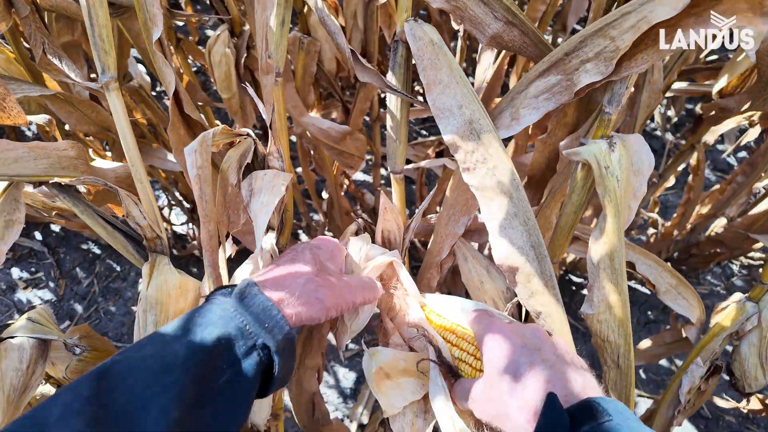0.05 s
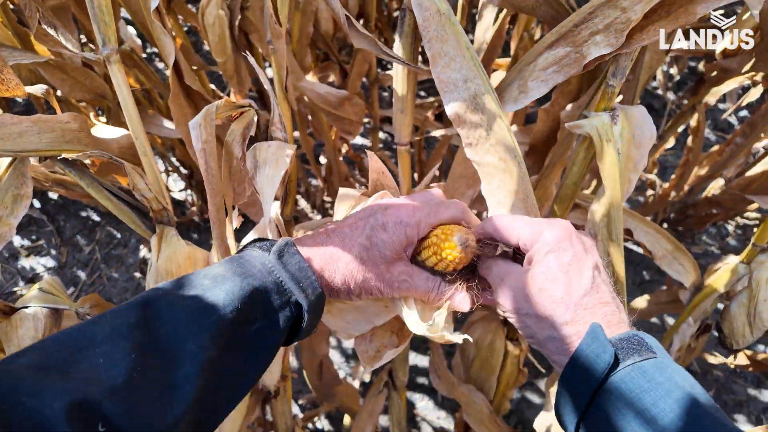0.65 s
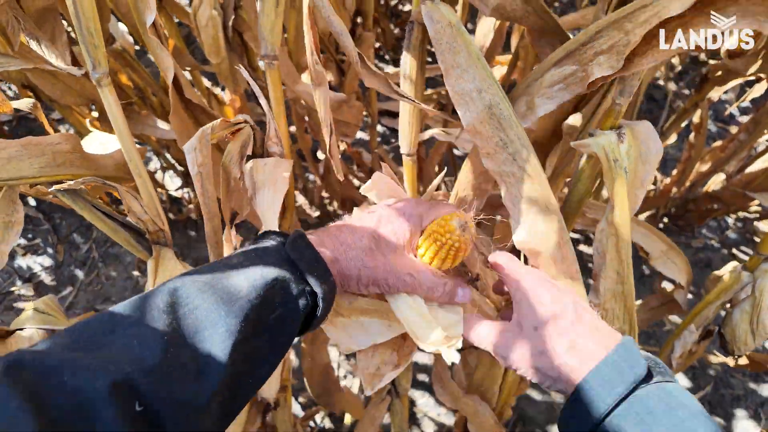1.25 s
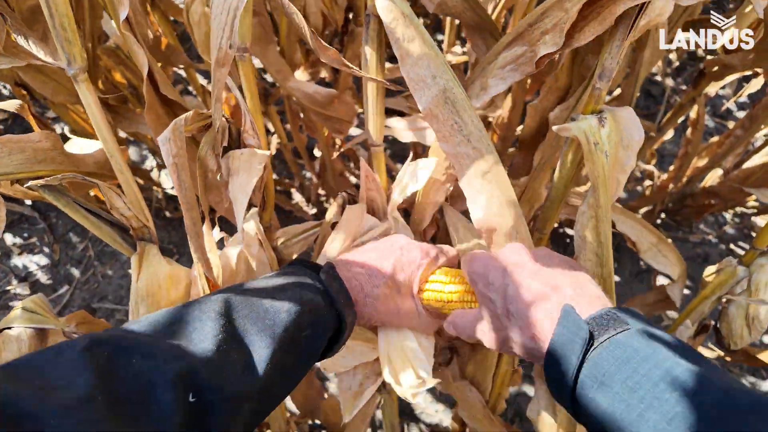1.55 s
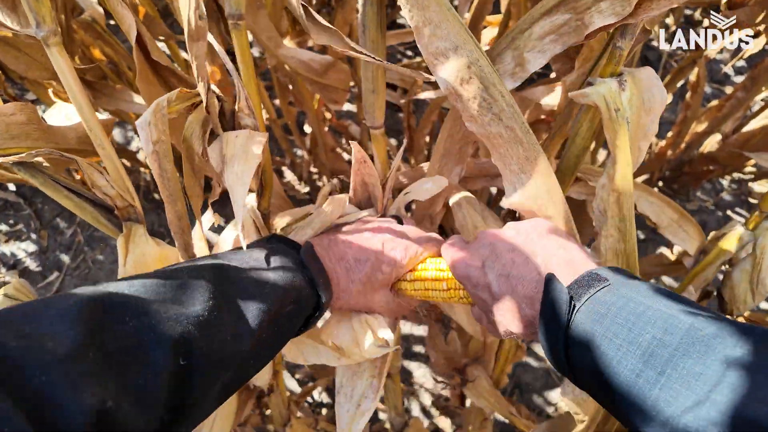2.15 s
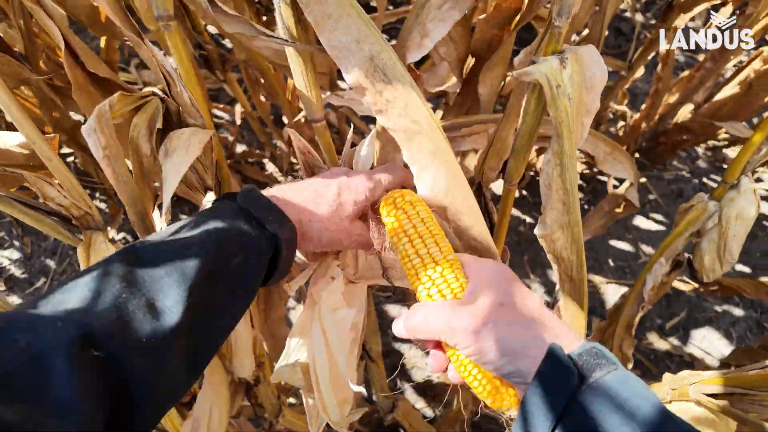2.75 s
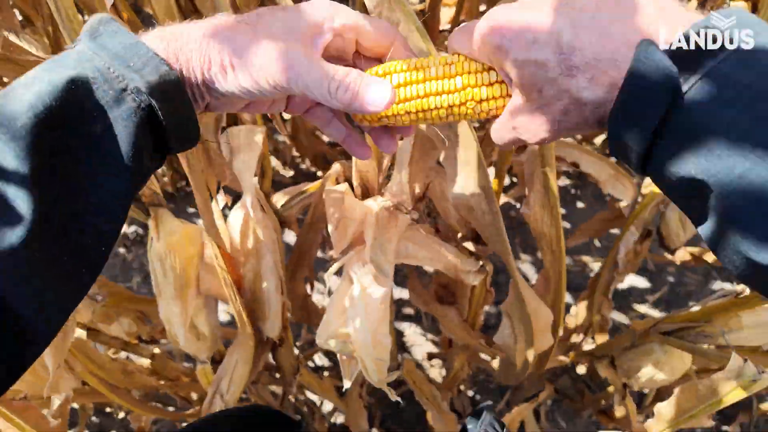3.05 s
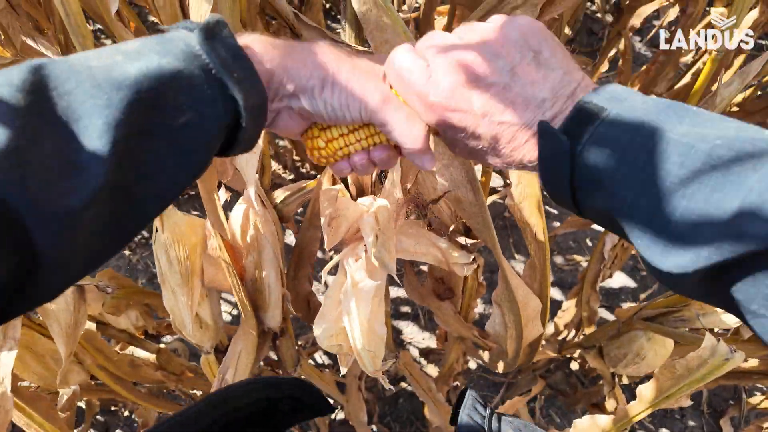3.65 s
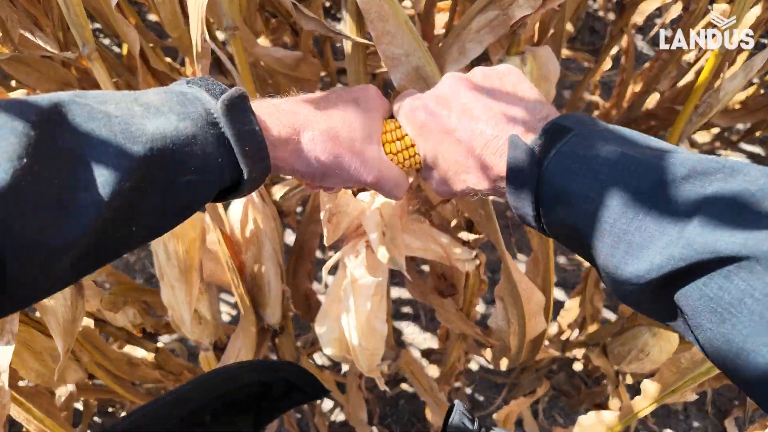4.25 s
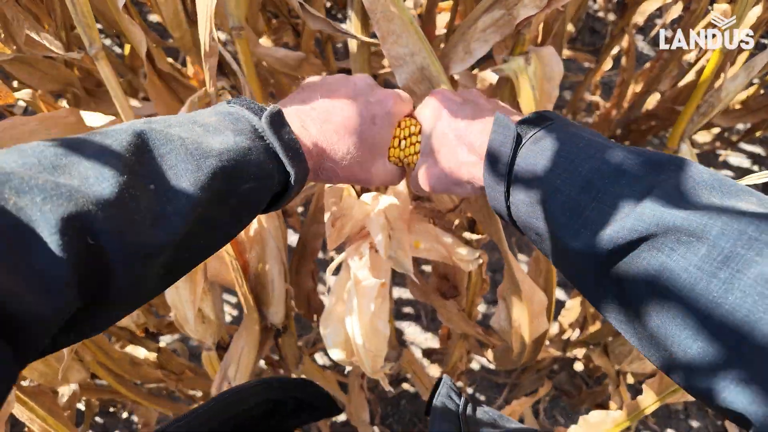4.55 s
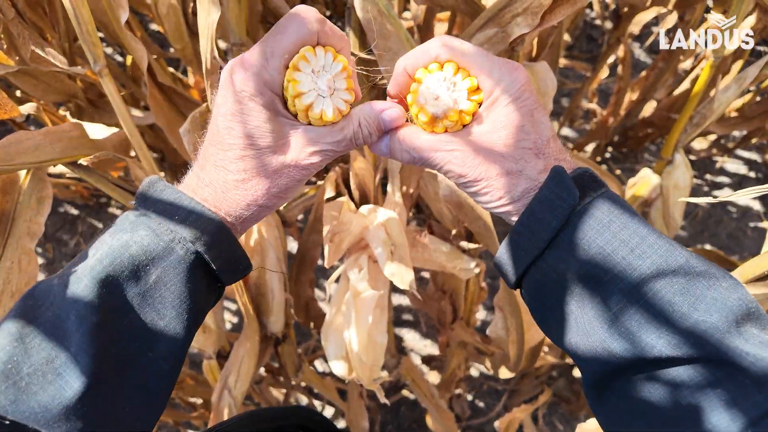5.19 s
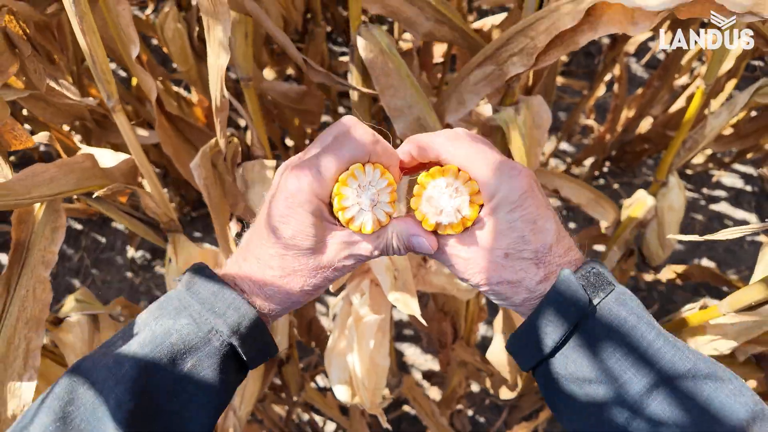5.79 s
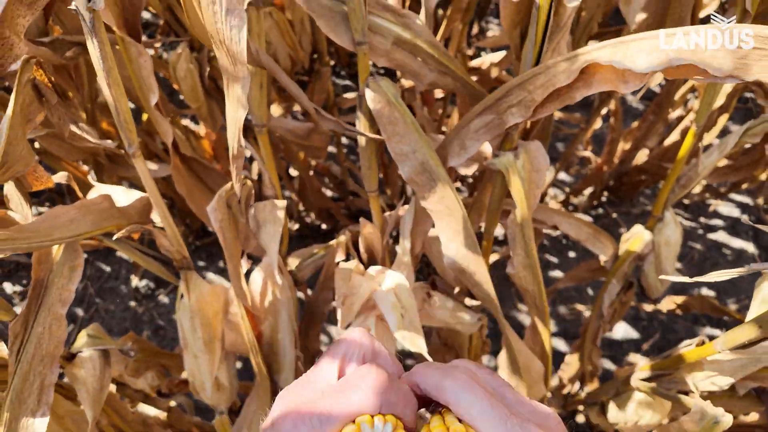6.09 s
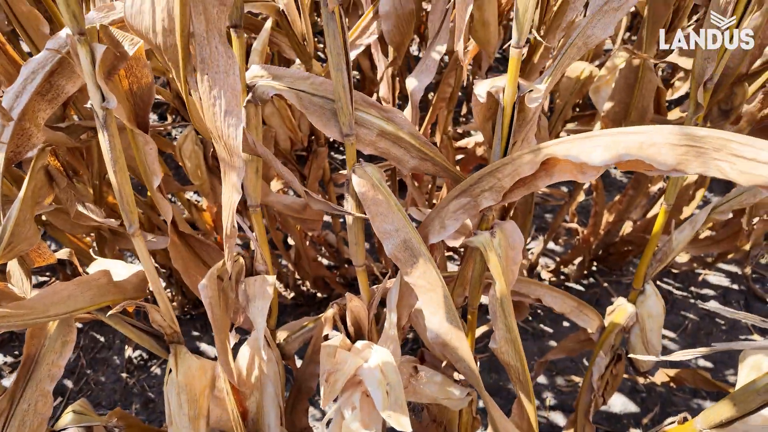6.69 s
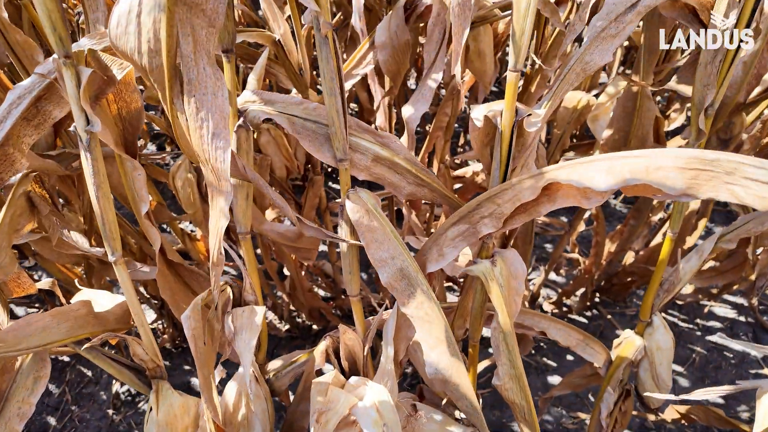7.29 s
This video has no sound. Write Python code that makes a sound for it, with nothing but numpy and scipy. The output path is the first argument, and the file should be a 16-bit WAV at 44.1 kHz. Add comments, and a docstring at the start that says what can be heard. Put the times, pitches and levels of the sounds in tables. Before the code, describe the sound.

From the start, hands strip dry husk from an ear of corn, very close. The papery leaves rub and crackle in a run of short pulls, dotted with sharp little snaps, growing stronger after 1 second. Around 2.6 to 2.9 seconds the ear tears off the stalk with loud crackling and two dull knocks. The rustle dies away by about 4 seconds, leaving faint finger clicks and scrapes on kernels. From 4.3 seconds the cob creaks and ticks, then breaks with a cluster of cracks at about 4.6, followed by a soft pop against the palm near 5. Between 5.2 and 5.9 seconds the halves knock together lightly several times with a hollow ring. Sleeves swish quietly and brush leaves until the end, around 7.4 seconds. Throughout, a faint, distant low drone and a slight stir of dry leaves fill the open field.

```python
"""Close by, hands strip the dry husk from an ear of corn, over a faint far drone and the stirring crop.
With each pull the papery leaves rub and buckle, ribs snap, and now and then a hand knocks dully. The ear
is torn off the stalk and the emptied husk cup rings. Sleeves swish, fingers click and scrape on kernels;
the cob creaks and breaks at about 4.6 s, and its hollow-ringing halves are knocked together.
Throughout, the standing crop scatters the handling into a short diffuse tail."""
import sys
import numpy as np
from scipy import signal
from scipy.fft import rfft, irfft, next_fast_len
from scipy.io import wavfile
from scipy.ndimage import uniform_filter1d, map_coordinates

SR = 44100
rng = np.random.default_rng(int(sys.argv[2]) if len(sys.argv) > 2 else 0)


def output_pcm(signal):
    """Save a mono or channel-first signal as 16-bit PCM at the path in sys.argv[1].

    Samples are clipped to [-1, 1] before scaling.
    """
    pcm = np.clip(np.atleast_2d(signal).T, -1, 1) * 32767
    wavfile.write(sys.argv[1], SR, np.round(pcm).astype(np.int16))


N = 323253


def amp(db):
    """Decibels to amplitude ratio."""
    return 10 ** (np.asarray(db) / 20)


def unit(x):
    """Normalisation to rms 1."""
    return x / np.sqrt(np.mean(x ** 2) + 1e-20)


def along(points, hz):
    """Interpolation of (frequency [Hz], value) points on a logarithmic frequency axis."""
    f, v = np.transpose(points)
    return np.interp(np.log(hz + 1), np.log(f + 1), v)


def add(track, s, sound):
    """Superposition of a sound on the track at time s."""
    start = max(round(s * SR), 0)
    track[start:start + len(sound)] += sound[:N - start]


def wobble(rate):
    """Slow random modulation: a spline through rate knots a second."""
    knots = rng.standard_normal(int(N * rate / SR) + 4)
    return map_coordinates(knots, [np.arange(N) * rate / SR])


def swell(s, rise_s, fall_s):
    """Gaussian envelope peaking at time s, down to 1/e rise_s before and fall_s after."""
    t = np.arange(N) / SR - s
    return np.exp(-(t / np.where(t < 0, rise_s, fall_s)) ** 2)


def strokes(rows):
    """Incoherent addition: the powers of swells (time [s], level [dB], rise [s], fall [s]) add."""
    return np.sqrt(sum(amp(db) ** 2 * swell(s, rise, fall) for s, db, rise, fall in rows))


def coloured(x, level_db, size=4096):
    """Minimum-phase filtering of x with the gain level_db(Hz)."""
    cepstrum = irfft(np.log(amp(level_db(np.fft.rfftfreq(size, 1 / SR))) + 1e-6))
    cepstrum[1:size // 2] *= 2
    cepstrum[size // 2 + 1:] = 0
    return signal.fftconvolve(x, irfft(np.exp(rfft(cepstrum))))[:len(x)]


def buckles(rate, spread_db, size):
    """Poisson process of rate tiny impulses a second: many weak, a few strong."""
    strength = amp(spread_db * np.clip(rng.standard_normal(size), -2.5, 2.5))
    return (rng.random(size) < rate / SR) * strength * rng.choice([-1, 1], size)


def rustle(spectrum, rate, spread_db, clump_db, crease_db, size=256):
    """Buckling noise of rms 1: sheets yield in spurts, each crease with passing resonances of its own."""
    spurts = amp(clump_db * (np.tanh(wobble(170) / 2) + np.tanh(wobble(50) / 2)))
    frames = signal.stft(buckles(rate, spread_db, N) * spurts, nperseg=size)[2]
    creases = uniform_filter1d(rng.standard_normal(frames.shape), size=3, axis=0)
    creases = unit(uniform_filter1d(creases, size=3, axis=1))
    crackle = signal.istft(frames * amp(crease_db * creases), nperseg=size)[1][:N]
    return unit(coloured(crackle, lambda hz: along(spectrum, hz)))


def fractures(events, spectrum, fibre_rate, rise, first_share, size=8192):
    """Brittle fracture: a first release, then an avalanche of fibres. Depth lifts lows, edge highs."""
    track, t = np.zeros(N), np.arange(size) / SR
    for s, db, depth, edge, t60 in events:
        growth = 1 - np.exp(-t / (rise * t60))
        burst = buckles(fibre_rate, 3, size) * growth * amp(-60 * t / t60)
        burst /= np.linalg.norm(burst) + 1e-9
        burst[0] += first_share
        tilt = [(500, 0.89 * depth), (1400, depth), (3500, 0), (7500, edge)]
        crack = coloured(burst, lambda hz: along(spectrum, hz) + along(tilt, hz))
        decay_samples = t60 * SR / np.log(1e6)  # the energy falls to 1/e in this span
        add(track, s, amp(db) * crack / np.linalg.norm(crack) * np.sqrt(decay_samples))
    return track


def effort(settle_db_per_s=27.5, contact_hollow_db=-3):
    """Envelopes of crackle and hollow rubbing: steady contact and single pulls add in power."""
    # leaves pressed on the hands, more firmly as the ear comes loose: (time [s], level [dB])
    grip = [(0, -42), (0.93, -45.5), (1.8, -43), (2.3, -36), (3.14, -39)]
    # pulls on the husk: (time [s], level [dB], rise [s], fall [s], hollow rubbing offset [dB])
    pulls = [(0.08, -35.5, 0.039, 0.04, 0.5), (0.19, -34, 0.066, 0.027, -3),
             (0.3, -39.5, 0.072, 0.045, -6.5), (0.44, -41, 0.055, 0.054, -1.5),
             (0.56, -32.5, 0.057, 0.031, -4), (0.67, -36, 0.028, 0.025, -6.5), (0.77, -42.5, 0.1, 0.13, -5),
             (1.06, -32.5, 0.052, 0.035, -4.5), (1.155, -27, 0.043, 0.052, -5), (1.37, -31, 0.19, 0.11, -6),
             (1.6, -35, 0.073, 0.078, -6.5), (1.715, -28.5, 0.033, 0.034, -1),
             (1.98, -27.5, 0.074, 0.09, -5.5), (2.159, -30, 0.055, 0.039, -1),
             (2.46, -35, 0.049, 0.034, -3), (2.66, -30.5, 0.031, 0.073, -9), (2.91, -28, 0.11, 0.097, -6.5)]
    t = np.arange(N) / SR
    times, levels = np.transpose(grip)
    settling_db = settle_db_per_s * np.maximum(t - times[-1], 0)  # once the ear is free
    contact = amp(np.interp(t, times, levels) - settling_db)
    crackle = strokes([(s, db, rise, fall) for s, db, rise, fall, _ in pulls])
    rubbing = strokes([(s, db + hollow, rise, fall) for s, db, rise, fall, hollow in pulls])
    return np.hypot(crackle, contact), np.hypot(rubbing, amp(contact_hollow_db) * contact)


def husk(crackle, rubbing):
    """Friction and buckling: dry sheets rub and tick, and the hollow wrap rustles with them."""
    # spectra of the papery sheets and of the wrap: (frequency [Hz], level [dB])
    paper = [(1060, -29.5), (1800, -14.5), (2300, -10.5), (2950, -3.5), (3200, 1.5), (4020, -1.5),
             (4970, -1.5), (5640, -2), (6780, -2.5), (8210, -6.5), (13100, -22), (15100, -26), (16000, -33)]
    hollow = [(47, -30), (80, -15), (113, -14), (280, -1.5), (348, -2), (403, 0), (572, -1), (671, -3),
              (980, -3), (1450, 0), (2250, -10.5), (2600, -9), (3380, -42), (5720, -120)]
    rub = amp(-1.73) * rustle(paper, rate=12000, spread_db=1.5, clump_db=4, crease_db=2)
    ticks = amp(-6.5) * rustle(paper, rate=400, spread_db=4, clump_db=5, crease_db=3)
    wrap = amp(-0.45) * rustle(hollow, rate=4000, spread_db=4.5, clump_db=2.5, crease_db=2)
    return crackle * (rub + ticks) + rubbing * wrap


def crop_stir():
    """Faint buckling noise: the dry leaves all around never quite keep still."""
    spectrum = [(900, -14), (1700, -4), (2400, 4), (3300, 0), (7000, -3), (10000, -14), (16000, -34)]
    return amp(-70) * rustle(spectrum, rate=5600, spread_db=4, clump_db=5.5, crease_db=2.5)


def far_drone(fundamental_hz=36):
    """Low broadband noise from far away, with harmonics 2 and 3 of a wavering hum."""
    # spectrum of the drone: (frequency [Hz], level [dB])
    spectrum = [(20, -24), (42, -12), (56, 1.5), (90, 1.5), (115, -0.5), (170, -4), (350, -5), (470, -4),
                (690, 0), (950, -13), (2000, -11.5), (8000, -35)]
    drone = unit(coloured(rng.standard_normal(N), lambda hz: along(spectrum, hz)))
    phase = 2 * np.pi * np.cumsum(fundamental_hz + 0.6 * wobble(4.7)) / SR
    hum = sum(amp(db + 1.8 * wobble(2.7)) * np.sin(order * phase) for order, db in [(2, -67), (3, -70)])
    return amp(-60.5 + 0.9 * wobble(2.6)) * drone + hum


def crop_scatter(x, size=8192, blocks=100):
    """Diffuse scattering by the crop: a short tail that changes as hands and leaves move."""
    # decay among the stalks: (frequency [Hz], t60 [s])
    decay = [(200, 0.084), (2000, 0.094), (12000, 0.15)]
    track, step = np.zeros(N), N // blocks
    for start in range(0, N, step):
        hz, t, noise = signal.stft(rng.standard_normal(size), SR, nperseg=256)
        tail = signal.istft(noise * amp(-60 * t / along(decay, hz)[:, None]), SR, nperseg=256)[1]
        add(track, start / SR, signal.fftconvolve(x[start:start + step], tail / np.linalg.norm(tail)))
    return track


def rib_snaps(edge_db=-2):
    """Brittle fracture of the husk's ribs."""
    # the loudest snaps: (time [s], relative level [dB], depth [dB], t60 [s])
    snaps = [(0.065, -15, -1, 0.03), (0.2106, -22.5, 9, 0.025), (0.3952, -20, 3, 0.02),
             (0.4327, -20, 4, 0.014), (0.5738, -23, 4, 0.015), (0.6878, -24, 9, 0.014),
             (0.7418, -16, -3, 0.009), (0.7949, -25, -8, 0.01), (1.0461, -19, 4, 0.01),
             (1.1503, -16, -3, 0.02), (1.1687, -14.5, -9, 0.02), (1.4212, -21, 0, 0.02),
             (1.709, -18, 4, 0.01), (1.828, -21.5, -15, 0.012), (1.9302, -16, 1, 0.005),
             (1.9838, -16, 0, 0.02), (2.0697, -8, -8, 0.006), (2.1497, -18, 5, 0.015),
             (2.1873, -7.5, 2, 0.005), (2.2426, -17, -9, 0.01), (2.6467, -13, 3, 0.03),
             (2.6521, -13, 3, 0.035), (2.669, -6, -18, 0.003), (2.6876, -19, -7, 0.025),
             (2.753, -20, -2, 0.015), (2.902, -13.5, 0, 0.025)]
    # spectrum of a rib: (frequency [Hz], level [dB])
    spectrum = [(60, -29.5), (250, 1), (450, -5.5), (850, -14), (1400, 5.5), (2300, -1), (3300, 3.5),
                (4500, 0.5), (7000, 1), (10000, -10.5), (16000, -32)]
    events = [(s, db, depth, edge_db, t60) for s, db, depth, t60 in snaps]
    return amp(-3) * fractures(events, spectrum, fibre_rate=9000, rise=0.059, first_share=0.48)


def hand_knocks(size=8192):
    """Damped impact: flesh absorbs vibration quickly, leaving one broad resonance."""
    # knocks of hands and cuffs: (time [s], peak level [dB], centre frequency [Hz], t60 [s])
    thumps = [(0.211, -26.5, 500, 0.043), (0.433, -27, 380, 0.025), (2.645, -17.5, 427, 0.094),
              (2.902, -19, 421, 0.032), (4.783, -31.5, 378, 0.048), (4.831, -45, 110, 0.066),
              (4.864, -41, 130, .08), (4.906, -34, 141, 0.054), (5.878, -39, 396, 0.057),
              (6.288, -44.5, 170, 0.039), (6.471, -54, 110, .08)]
    track, t = np.zeros(N), np.arange(size) / SR
    for s, db, centre_hz, t60 in thumps:
        push = rng.standard_normal(size) * amp(-60 * t / t60)
        knock = coloured(push, lambda hz: -20 * np.log10(1 + np.log2((hz + 1) / centre_hz) ** 4))
        add(track, s, amp(db) * knock / np.abs(knock).max())
    return track


def husk_cup(crackle):
    """Resonance of the emptied husk cup, driven by the pulling as the ear slides out."""
    spectrum = [(1500, -66.5), (2500, -11.5), (2950, -2.5), (3400, -14.5), (6000, -40.5)]
    drive = amp(-4) * crackle * swell(2.77, rise_s=0.34, fall_s=0.18)
    return drive * rustle(spectrum, rate=2700, spread_db=7.5, clump_db=5, crease_db=4)


def sleeves():
    """Friction noise of moving arms: cloth swishes and brushes the leaves."""
    # arm movements: (mid time [s], duration [s], relative brush level [dB], relative cloth level [dB])
    swishes = [(4.2, 0.86, -63, -62), (4.67, 0.3, -59, -57.5), (5.14, 0.34, -59.5, -56),
               (5.505, 0.34, -65.5, -61.5), (5.95, 0.24, -61, -59.5), (6.19, 0.22, -54.5, -54),
               (6.747, 0.8, -63.5, -64), (7.298, 0.32, -59.5, -77)]
    # spectra of brushed leaves and of cloth: (frequency [Hz], level [dB])
    leaf = [(1500, -1), (3300, 1), (4500, -4.5), (6500, -2.5), (10000, -14.5), (16000, -43)]
    fabric = [(80, -6), (300, 7.5), (800, 0), (1250, 2), (2300, -3), (3500, -8.5), (6000, -36.5)]
    brush = strokes([(s, db, length / 2, length / 2) for s, length, db, _ in swishes])
    cloth = strokes([(s, db, length / 2, length / 2) for s, length, _, db in swishes])
    brush *= amp(0.5) * rustle(leaf, rate=6300, spread_db=3, clump_db=3, crease_db=-1)
    cloth *= amp(2) * rustle(fabric, rate=9000, spread_db=3, clump_db=1.5, crease_db=2)
    return brush + cloth


def kernel_clicks(edge_db=4, t60=0.021):
    """Impact transients: kernels click under the fingers, and the cob's halves knock together."""
    # finger clicks: (time [s], relative level [dB], depth [dB])
    clicks = [(3.712, -42, -9), (3.943, -43.5, -18), (4.171, -44.5, -12), (4.9012, -36.5, 12),
              (5.0187, -38.5, 20), (5.0616, -39, -4), (5.1159, -34, 9), (5.1624, -31.5, 4),
              (5.1804, -34.5, 1), (5.2045, -40, 6), (5.2408, -37, 8), (5.314, -36, -4), (5.4632, -42, -15),
              (6.0831, -42, 3), (6.9995, -46.5, -12)]
    # knocks of the halves: (time [s], relative level [dB], depth [dB], edge [dB], t60 [s])
    taps = [(5.2809, -22.5, -5, 2, 0.023), (5.3483, -31, 10, 15, 0.034), (5.4, -26.5, 9.5, 1, 0.032),
            (5.502, -29, 5, -4, 0.045), (5.7509, -36, 7, 9, 0.032), (5.8781, -30, -0.5, 3.5, 0.05)]
    # spectrum of a kernel: (frequency [Hz], level [dB])
    spectrum = [(60, -24), (150, -5.5), (260, -1.5), (480, 0), (650, -2.5), (980, -4), (1350, 4),
                (2000, -2), (2600, 2), (3400, -1.5), (4000, -4.5), (5200, -2.5), (7000, -8.5),
                (10000, -21.5), (16000, -44)]
    events = [(s, db, depth, edge_db, t60) for s, db, depth in clicks] + taps
    return amp(-1.5) * fractures(events, spectrum, fibre_rate=9000, rise=0.0074, first_share=0.46)


def finger_scrapes():
    """Sliding friction of skin over kernels."""
    # slides: (mid time [s], duration [s], level [dB])
    scrapes = [(3.794, 0.097, -44.5), (4.327, 0.057, -43.5), (4.555, 0.085, -42.5), (4.699, 0.073, -37.5),
               (4.908, 0.074, -44.5), (4.949, 0.06, -48.5), (5.074, 0.056, -47), (5.15, 0.13, -47.5),
               (5.311, 0.047, -43.5), (5.425, 0.071, -53.5), (5.769, 0.05, -50), (5.828, 0.11, -55)]
    skin = [(100, 0.5), (500, 0), (1300, -2.5), (2300, 0), (3600, 1.5), (6500, -5), (10000, -16),
            (16000, -35)]
    sliding = strokes([(s, db, length / 4, length / 4) for s, length, db in scrapes])
    return sliding * rustle(skin, rate=2800, spread_db=2.5, clump_db=7.5, crease_db=3.5)


def cob_break():
    """Progressive fracture in bending: the cob ticks, then gives way."""
    # cracks: (time [s], relative level [dB], depth [dB], edge [dB], t60 [s])
    cracks = [(4.3227, -36.5, 6, -13, 0.02), (4.3899, -28.5, -9, -11, 0.0043),
              (4.4168, -33, -17, -5, 0.0058), (4.4431, -33.5, 4, 4, 0.013), (4.4557, -28, 3, 1, 0.007),
              (4.4626, -24.5, -1, 8, 0.0091), (4.469, -24.5, 1, 2, 0.025), (4.5102, -21, -1, -12, 0.021),
              (4.518, -21, 4, 0, 0.026), (4.5384, -30, 14, 18, 0.025), (4.6228, -27.5, 0, 0, 0.008),
              (4.6378, -14, -3.5, -15, 0.027), (4.6571, -21.5, 9, -6, 0.011),
              (4.6997, -17, -0.5, 8.5, 0.018), (4.7199, -32, 0, 6, 0.026), (4.7523, -31.5, 1, 5, 0.013)]
    # spectrum of the cob: (frequency [Hz], level [dB])
    spectrum = [(60, -21), (250, -4), (450, -5), (650, -1), (850, -4), (1250, 2.5), (1800, -1),
                (2300, -3.5), (3400, -3), (5000, -1.5), (7000, -6), (10000, -18.5), (16000, -34)]
    return amp(-1.63) * fractures(cracks, spectrum, fibre_rate=12000, rise=0.053, first_share=0.14)


def cob_ring(drive, size=4096):
    """Modal resonance: the cob's damped modes ring hollow when shaken."""
    # modes: (frequency [Hz], gain at resonance [dB], t60 [s])
    modes = [(590, -7, 0.061), (1365, -6, 0.044), (3460, -1.5, 0.015)]
    t = np.arange(size) / SR
    response = sum(amp(db - 60 * t / t60) * np.cos(2 * np.pi * hz * t) * np.log(1e6) / (t60 * SR)
                   for hz, db, t60 in modes)
    return signal.fftconvolve(drive, response)[:N]


def palm_pop():
    """Cushioned impact: one half of the cob pops against the palm."""
    # the pop: (time [s], relative level [dB], depth [dB], edge [dB], t60 [s])
    pop = [(4.9722, -15.5, -1.5, -10.5, 0.0051)]
    # spectrum of the palm: (frequency [Hz], level [dB])
    spectrum = [(30, -18), (150, 0.5), (600, 0.5), (1300, -7), (2400, -17), (3300, -28), (5200, -16),
                (8000, -30), (16000, -38)]
    return amp(-1.5) * fractures(pop, spectrum, fibre_rate=9000, rise=0.102, first_share=2)


def scene():
    """Superposition of the direct handling, its scatter and the open field, in mono."""
    crackle, rubbing = effort()
    close = husk(crackle, rubbing) + rib_snaps() + hand_knocks() + husk_cup(crackle)
    close += sleeves() + finger_scrapes()
    clicking, breaking = kernel_clicks(), cob_break()
    close += clicking + breaking + cob_ring(breaking + amp(6.5) * clicking) + palm_pop()
    return (close + amp(-11.5) * crop_scatter(close) + crop_stir() + far_drone())[None]


def record(dry, top_hz=15950):
    """Band limiting: an ideal low-pass filter removes everything above top_hz."""
    size = next_fast_len(N + SR // 2)
    passband = np.fft.rfftfreq(size, 1 / SR) < top_hz
    return irfft(rfft(dry, size) * passband, size)[..., :N]


dry = scene()
out = record(dry)
output_pcm(out)
```